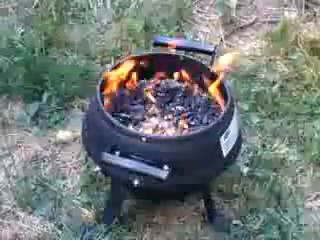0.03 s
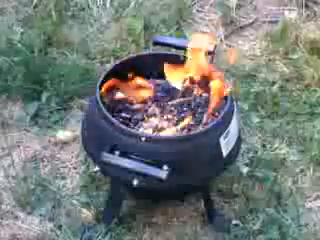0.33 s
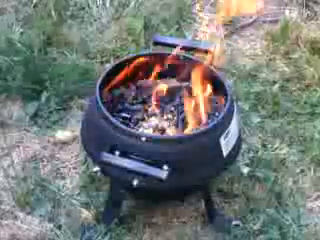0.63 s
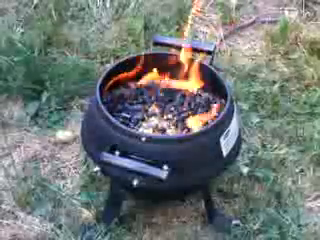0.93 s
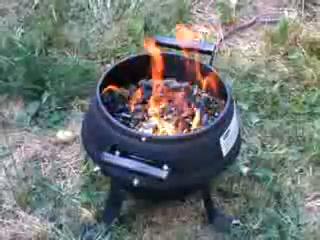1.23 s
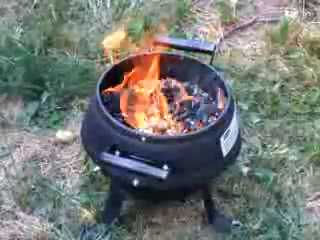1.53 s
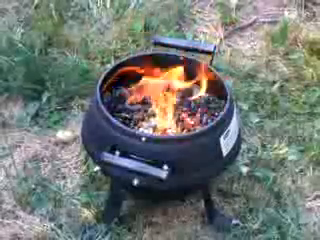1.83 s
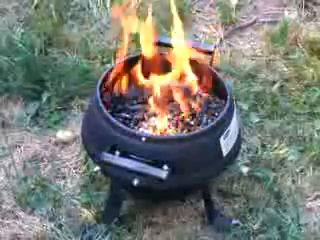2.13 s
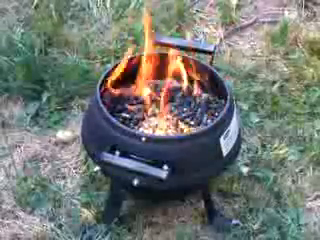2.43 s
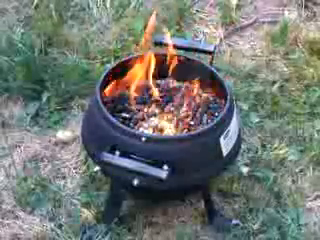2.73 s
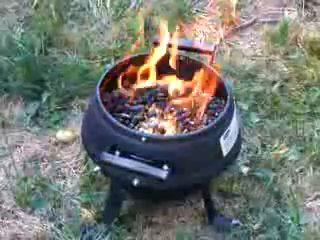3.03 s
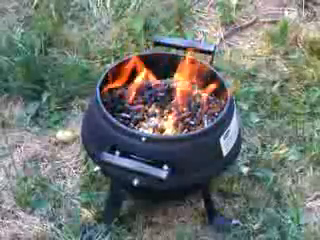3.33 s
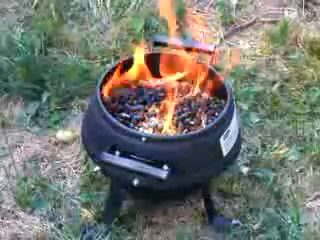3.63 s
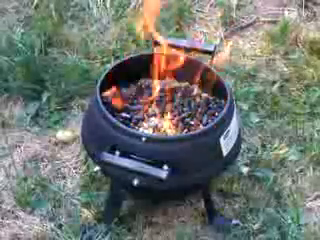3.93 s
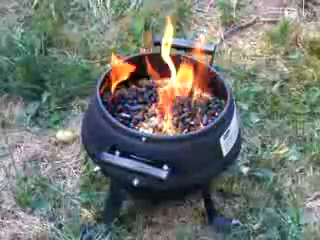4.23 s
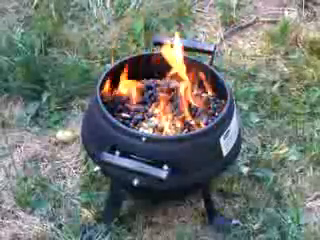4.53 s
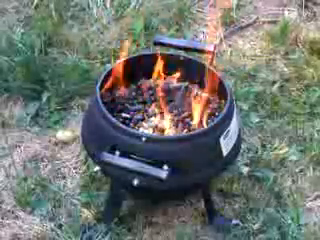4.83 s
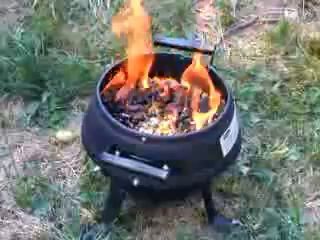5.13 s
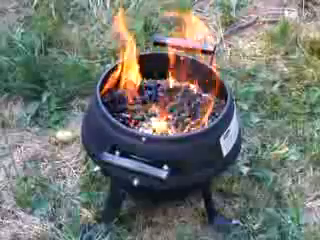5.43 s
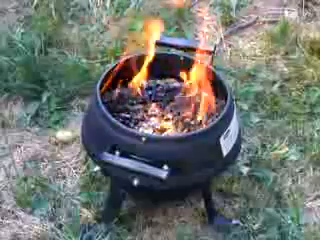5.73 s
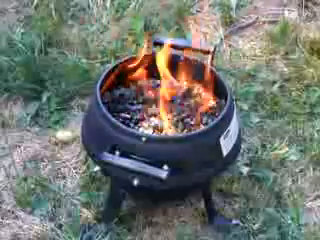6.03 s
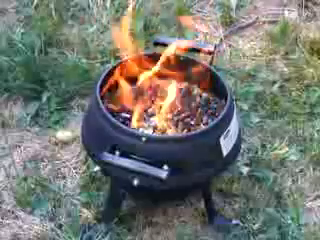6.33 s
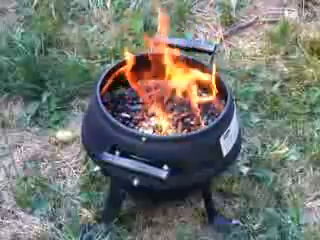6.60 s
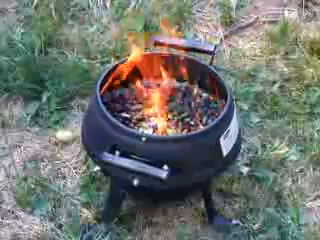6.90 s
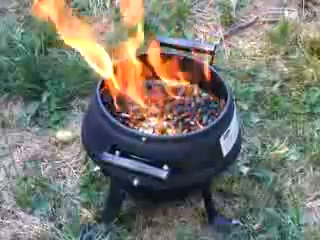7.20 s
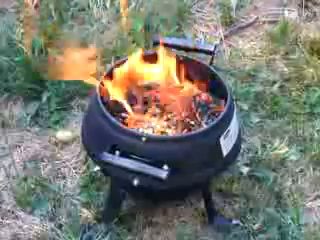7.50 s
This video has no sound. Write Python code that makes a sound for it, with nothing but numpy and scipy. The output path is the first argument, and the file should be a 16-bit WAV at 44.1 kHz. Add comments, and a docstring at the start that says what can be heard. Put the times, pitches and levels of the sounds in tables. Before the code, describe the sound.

Close to the microphone, a hand-held camera clicks and its focus motor stutters in short buzzes, with one soft bump. After about two seconds only the background remains: the even hiss of a small fire, faintly ticking and fluttering, and distant outdoor noise. A thin cricket trill, barely there at first, returns more clearly in the second half, while a faint low hum swells once. The sound is mono and grainy.

```python
"""A small fire hisses in an iron pot in a quiet garden: turbulent flames flutter, embers tick.
A bush cricket trills twice by stridulation, over a distant wash in which a low hum swells once.
A button click rings the shell of a hand-held camera; its focus motor hunts in buzzing moves for two
seconds, driving the lens barrel into vibration, and the hand bumps the camera once.
All reaches one microphone and a coarse converter, whose quantisation adds a grainy hiss."""
import sys
import numpy as np
from scipy import signal
from scipy.fft import rfft, irfft, next_fast_len
from scipy.io import wavfile
from scipy.ndimage import uniform_filter1d, map_coordinates

SR = 44100
rng = np.random.default_rng(int(sys.argv[2]) if len(sys.argv) > 2 else 0)


def materialize(psi):
    """Save the field psi as 16-bit PCM at rate SR to the path in sys.argv[1].

    A 1-D psi becomes a single channel; in a 2-D psi each row is a channel.
    """
    bounded = np.clip(np.atleast_2d(psi).T, -1, 1)
    quanta = np.round(bounded * 32767).astype(np.int16)
    wavfile.write(sys.argv[1], SR, quanta)


N = 337806

# Noise spectra of the sources (f/Hz, relative level/dB)
FLAME_SPECTRUM = [(8, -4), (22, -1.5), (60, 0.5), (110, -1.5), (180, -4), (260, -4.5), (400, -10),
                  (600, -28), (900, -59)]
EMBER_SPECTRUM = [(600, -22), (1400, -5.5), (2000, 0), (2800, 0), (4000, -0.5), (5500, -1.5), (7000, -1.86),
                  (8500, -2), (10000, -38.5)]
WASH_SPECTRUM = [(120, -25.5), (280, -7.5), (400, -2.5), (650, 0), (900, -3), (1200, -2.5), (1500, -6.5),
                 (2000, -9), (3500, -30.5)]
WING_SPECTRUM = [(6000, -44.5), (7100, -21), (7500, -9), (7700, -7), (7850, 0), (8000, -3), (8300, -8),
                 (9000, -30)]
GEAR_SPECTRUM = [(300, -15.5), (700, 6.5), (1500, 2.5), (2800, -5.5), (4200, -3), (4900, 7), (5500, -1.5),
                 (8000, -6)]
# Flares of the flames (crest t/s, half width/s, rise/dB)
FLARES = [(1.53, .12, 5.5), (4.19, .11, 3.5), (5.68, .08, 2.5)]
# Cricket trills (end t/s, initial stroke rate/Hz, final level before the surge/dB)
TRILLS = [(1.9, 51.5, -54), (6.85, 44, -45.3)]
# Button clicks (t/s, ring level before the bass cut/dB, crack relative to ring/dB)
CLICKS = [(0.189, -38, -2), (0.2254, -28, -0.5), (0.229, -35.5, -9), (0.2389, -8, -14), (0.266, -37, -7),
          (0.507, -38, 1)]
# Runs of focus moves (t/s, moves, frames between moves, move length/s, whine level/dB,
# barrel level/dB, barrel f/Hz, barrel fade per move/dB)
FOCUS_RUNS = [(.2558, 9, 1, 0.013, -52, -47, 646, 0), (.591, 2, 3, 0.0063, -54.5, -47, 690, 2),
              (.8238, 6, 3, 0.0073, -52.5, -41, 624, .7), (1.455, 2, 1, .0075, -54, -42, 687, -0.5),
              (1.556, 2, 1, .007, -53, -46.5, 690, -0.5), (1.657, 3, 3, 0.0085, -51, -44.5, 645, -0.5),
              (1.990, 4, 1, 0.0062, -56, -41.5, 699, 2.2)]
# Knocks of the hand (t/s, peak level/dB)
KNOCKS = [(1.558, -35)]
# Modes of the camera's plastic shell, grip and lens (f/Hz, relative level/dB, T60/s)
SHELL_MODES = [(790, -19.5, .04), (1090, -16.5, 0.02), (1224, -9.5, 0.028), (1434, -3.5, 0.024),
               (1883, -10.5, 0.016), (2230, -4.5, .015), (2646, -3, 0.013), (2980, 0, .012),
               (3720, -7.5, 0.016), (4160, -13, 0.017), (5170, -14, .012), (5510, -13.5, 0.013),
               (6420, -15.5, 0.014), (7260, -12.5, 0.0078)]
GRIP_MODES = [(170, -13.5, 0.045), (467, -0.5, .035), (1162, -1, .02), (1510, -4, .015)]
LENS_MODES = [(1250, -6, .05), (1706, 0, .05)]
# Response of the converter's reconstruction filter (f/Hz, gain/dB)
RECONSTRUCTION = [(5500, 0), (6600, -0.74), (7400, -2.5), (8000, -5.5), (8700, -10.5), (9200, -18),
                  (9700, -23), (10000, -42)]

TIME = np.arange(N) / SR


def amp(db):
    """Amplitude ratio of a level in decibels."""
    return 10 ** (np.asarray(db) / 20)


def unit(x):
    """Normalisation to rms 1."""
    return x / np.sqrt(np.mean(x ** 2) + 1e-20)


def bell(t, centre, width):
    """Gaussian envelope of height 1."""
    return np.exp(-.5 * ((t - centre) / width) ** 2)


def gain_at(spectrum, hz):
    """Gain by interpolation of levels on a logarithmic frequency axis."""
    f, db = np.transpose(spectrum)
    return amp(np.interp(np.log(hz + 1), np.log(f + 1), db))


def wobble(rate):
    """Smooth random modulation, with rate knots a second."""
    return map_coordinates(rng.standard_normal(int(N * rate / SR) + 4), [TIME * rate])


def filtered(x, response):
    """Linear filtering: the spectrum of x times a frequency response."""
    size = next_fast_len(N + SR // 2)
    return irfft(rfft(x, size) * response(np.fft.rfftfreq(size, 1 / SR)), size)[..., :N]


def coloured(x, spectrum):
    """Spectral shaping of x, at rms 1."""
    return unit(filtered(x, lambda hz: gain_at(spectrum, hz)))


def rush(spectrum, patchy_db):
    """Turbulent noise of rms 1, its gain varying in patches over time and frequency."""
    cells = signal.stft(rng.standard_normal(N), nperseg=512)[2]
    patches = uniform_filter1d(rng.standard_normal(cells.shape), size=6, axis=0)
    patches = uniform_filter1d(patches, size=14, axis=1)
    noise = signal.istft(cells * amp(patchy_db * unit(patches)), nperseg=512)[1]
    return coloured(noise[:N], spectrum)


def add(track, s, sound):
    """Superposition of a sound on the track at time s."""
    part = track[max(round(s * SR), 0):][:len(sound)]
    part += sound[:len(part)]


def ring(modes, t, scatter_db):
    """Free vibration of peak 1: damped modes, with neighbours in antiphase."""
    motion = np.zeros(len(t))
    for k, (hz, db, t60) in enumerate(modes):
        envelope = amp(db + scatter_db * rng.standard_normal() - 60 * t / t60)
        motion += (-1) ** k * envelope * np.sin(2 * np.pi * hz * t)
    return motion / np.abs(motion).max()


def fire(flame_db=-61.5, flicker_db=.8, hiss_db=-54.6, tick_db=-74.5, ticks_per_s=45):
    """Turbulent combustion flutters in the bass; the embers hiss, and tick as a Poisson process."""
    flare_db = sum(db * bell(TIME, s, width) for s, width, db in FLARES)
    flames = amp(flame_db + flare_db + flicker_db * wobble(14)) * rush(FLAME_SPECTRUM, patchy_db=.4)
    hiss = amp(hiss_db + .08 * wobble(9.7)) * rush(EMBER_SPECTRUM, patchy_db=.71)
    ticks = rng.random(N) < ticks_per_s / SR
    strength = amp(3.7 * np.minimum(rng.exponential(size=N), 3))
    return flames + hiss + amp(tick_db) * coloured(ticks * strength, EMBER_SPECTRUM)


def garden_wash(level_db=-54):
    """Ambient noise from far away: broadband and nearly steady."""
    return amp(level_db + .2 * wobble(7)) * rush(WASH_SPECTRUM, patchy_db=.52)


def cricket(trill_s=2.75, sag_hz_per_s=1.9, swell_db_per_decade=12, surge_db=1.2, surge_s=1.6):
    """Stridulation: each stroke excites the wing's resonance; a trill slows and swells in waves."""
    envelope = np.zeros(N)
    t = np.arange(-SR // 80, SR // 80) / SR
    for end, start_rate, db in TRILLS:
        sung = TIME - (end - trill_s)
        rate = (start_rate - sag_hz_per_s * sung) * (sung > 0) * (TIME < end)
        stroke_count = np.floor(np.cumsum(rate) / SR)
        for i in np.flatnonzero(np.diff(stroke_count)):
            swell = swell_db_per_decade * np.log10(sung[i] / trill_s)
            surge = -surge_db * np.cos(2 * np.pi * sung[i] / surge_s)
            level_db = db + swell + surge + .6 * rng.standard_normal()
            add(envelope, TIME[i] + t[0], amp(level_db) * bell(t, 0, width=.0045))
    return envelope * coloured(rng.standard_normal(N), WING_SPECTRUM)


def button(cutoff_hz=650):
    """Impulse excitation: the button snaps and rings a shell too small to radiate bass."""
    clicks, t = np.zeros(N), np.arange(SR // 10) / SR
    for s, db, crack_db in CLICKS:
        shell = ring(SHELL_MODES, t, scatter_db=.5)
        crack_envelope = amp(crack_db - 60 * t / .013) + amp(-28.5 - 60 * t / .13)
        add(clicks, s, amp(db) * (shell + crack_envelope * rng.standard_normal(len(t))))
    return signal.sosfilt(signal.butter(3, cutoff_hz, "highpass", fs=SR, output="sos"), clicks)


def focus_motor(step_hz=4805, frame_s=1 / 30, barrel_t60=.033, gear_db=-50.5, detune=.025):
    """Forced vibration: a stepper, timed by the frames, whines, rattles gears and shakes the barrel."""
    tones, gears = np.zeros(N), np.zeros(N)
    t = np.arange(SR // 12) / SR
    whine = np.sin(2 * np.pi * step_hz * t) + amp(-10) * np.sin(2 * np.pi * 5780 * t)
    whine *= 1 - np.exp(-t / .003)  # builds up over the first steps
    for start, moves, frames, length, whine_db, barrel_db, barrel_hz, fade_db in FOCUS_RUNS:
        running = np.clip(t / .001, 0, 1) * np.clip((length - t) / .003 + 1, 0, 1)
        swing = np.minimum(t / length, 1) * amp(-60 * np.maximum(t - length, 0) / barrel_t60)
        hz = barrel_hz * (1 + .1 * np.tanh((t - length) / length))  # climbs as the barrel swings free
        for k, (louder, higher) in enumerate(rng.standard_normal((round(moves), 2))):
            s = start + k * round(frames) * frame_s
            barrel = swing * np.sin(2 * np.pi * np.cumsum(hz * (1 + detune * higher)) / SR)
            add(tones, s, amp(barrel_db - k * fade_db + .8 * louder) * barrel)
            add(tones, s, amp(whine_db) * running * whine)
            add(gears, s, amp(gear_db) * running)
    return tones + gears * coloured(rng.standard_normal(N), GEAR_SPECTRUM)


def hand_knock():
    """A soft impact of the hand excites the low, heavily damped modes of the grip."""
    knocks, t = np.zeros(N), np.arange(SR // 10) / SR
    for s, db in KNOCKS:
        add(knocks, s, amp(db) * ring(GRIP_MODES, t, scatter_db=1))
    return knocks


def lens_stop(at_s=2.089, peak_db=-43):
    """A light impact as the lens comes to rest leaves it in free vibration."""
    tap, t = np.zeros(N), np.arange(SR // 12) / SR
    add(tap, at_s, amp(peak_db) * ring(LENS_MODES, t, scatter_db=3))
    return tap


def distant_hum(hz=194, crest_s=5.45, half_width_s=.6, level_db=-64.5):
    """A far, low tone swells once, with slight random modulation of amplitude and frequency."""
    envelope = amp(level_db + 1.5 * wobble(9)) * bell(TIME, crest_s, half_width_s)
    return envelope * np.sin(2 * np.pi * np.cumsum(hz + 1.5 * wobble(6)) / SR)


def scene():
    """Superposition at one microphone, which feeds both channels."""
    mono = fire() + garden_wash() + cricket()
    mono += button() + focus_motor() + hand_knock() + lens_stop() + distant_hum()
    return np.array([mono, mono])


def record(dry, start_s=.086, converter_hz=16000, quantum=.0052, top_hz=10200):
    """Sampling and quantisation: the camera starts after a moment; its coarse steps add a grainy hiss."""
    samples = signal.resample_poly(dry * (TIME >= start_s), converter_hz, SR, axis=1)
    quantised = quantum * np.floor(samples / quantum)
    # Imaging: output as spikes mirrors the top of the band above half the converter's rate.
    spikes = np.kron(quantised, [3, 0, 0])
    played = signal.resample_poly(spikes, SR, 3 * converter_hz, axis=1)[:, :N]
    return filtered(played, lambda hz: gain_at(RECONSTRUCTION, hz) * (hz < top_hz))


dry = scene()
out = record(dry)
materialize(out)
```